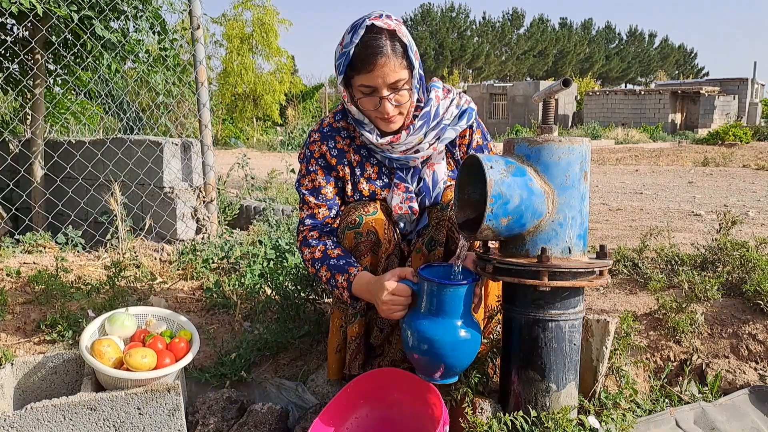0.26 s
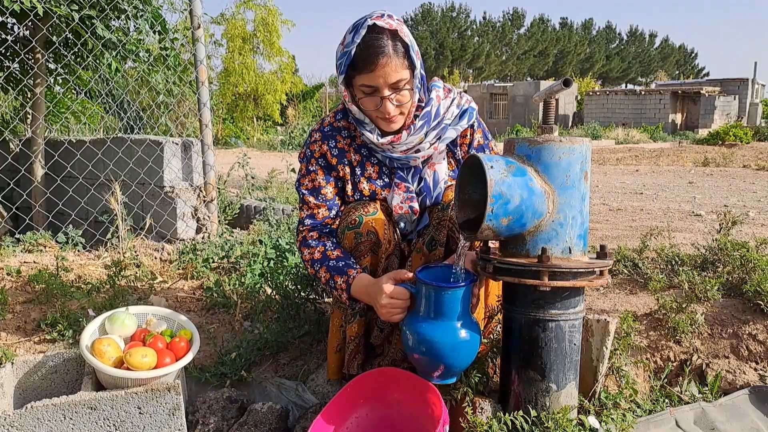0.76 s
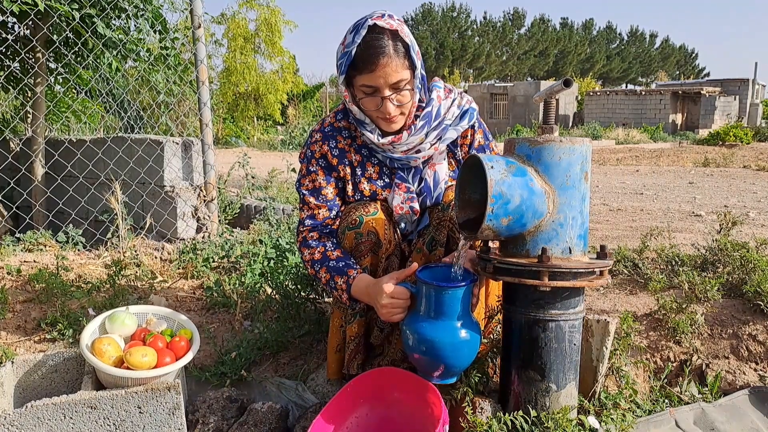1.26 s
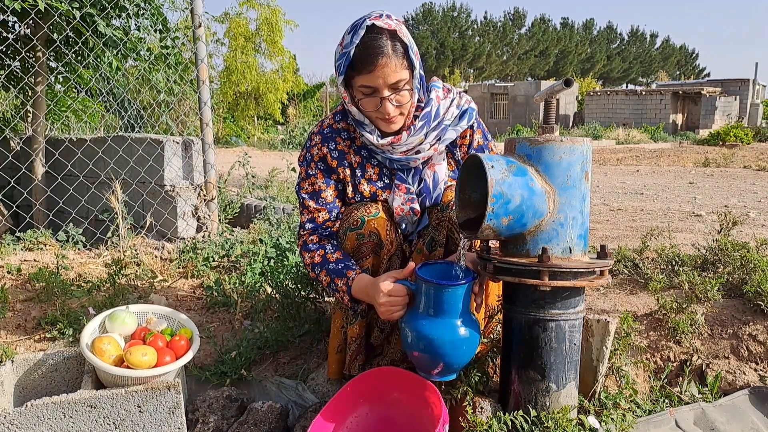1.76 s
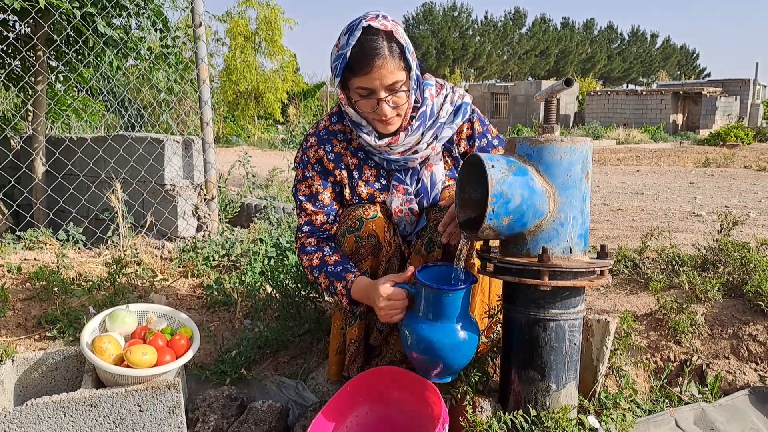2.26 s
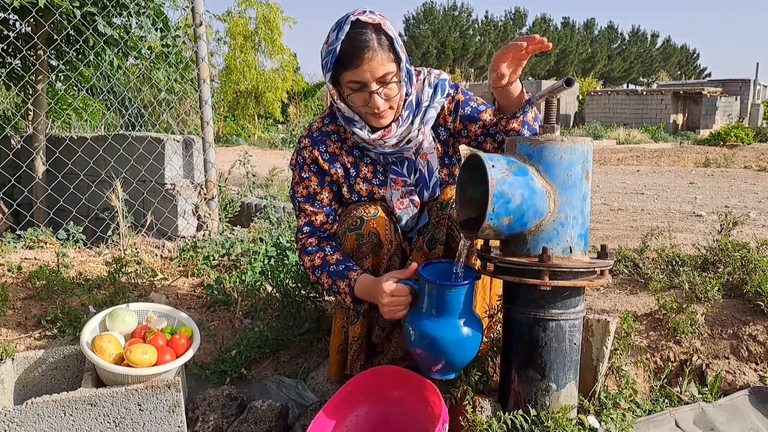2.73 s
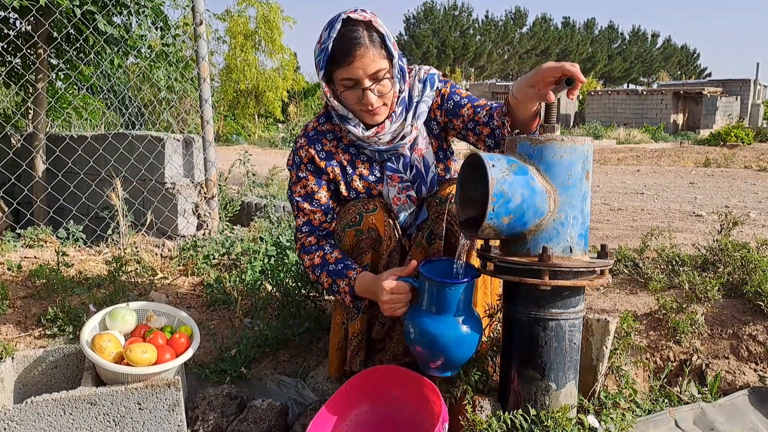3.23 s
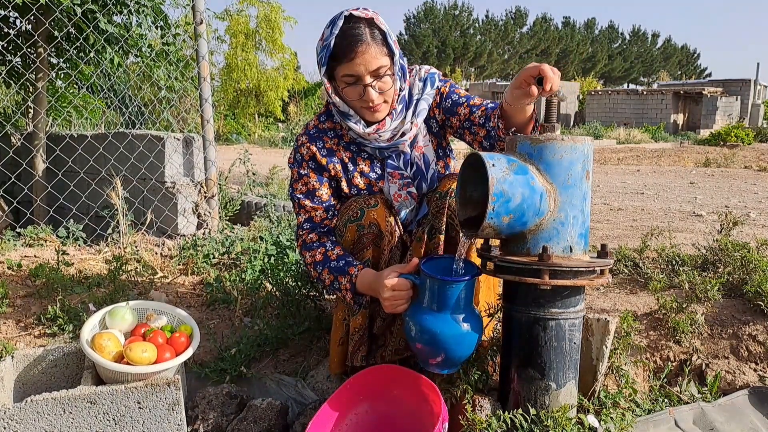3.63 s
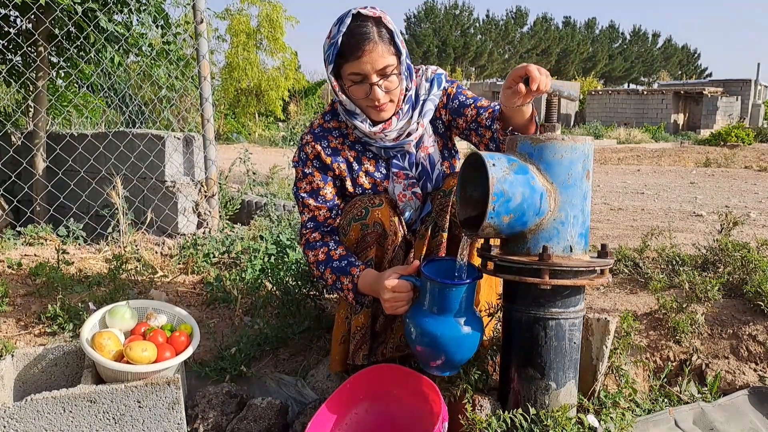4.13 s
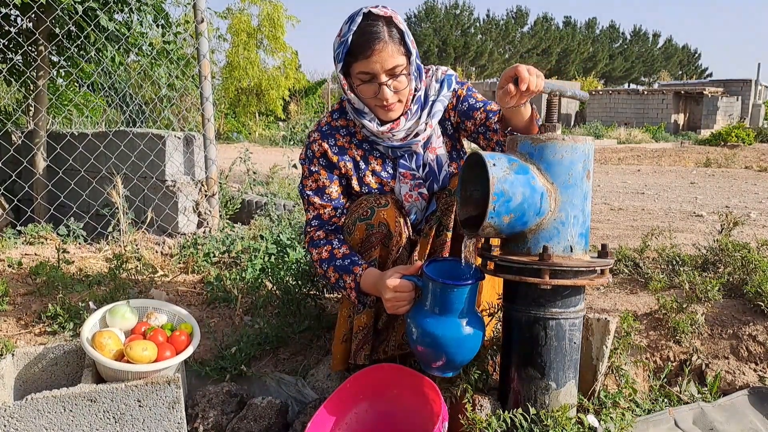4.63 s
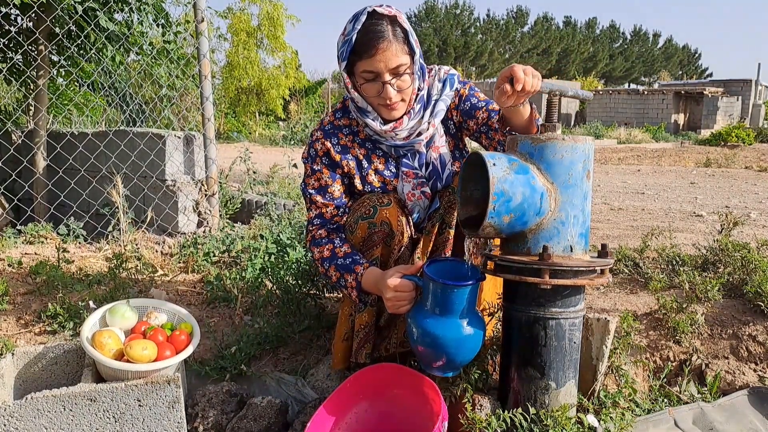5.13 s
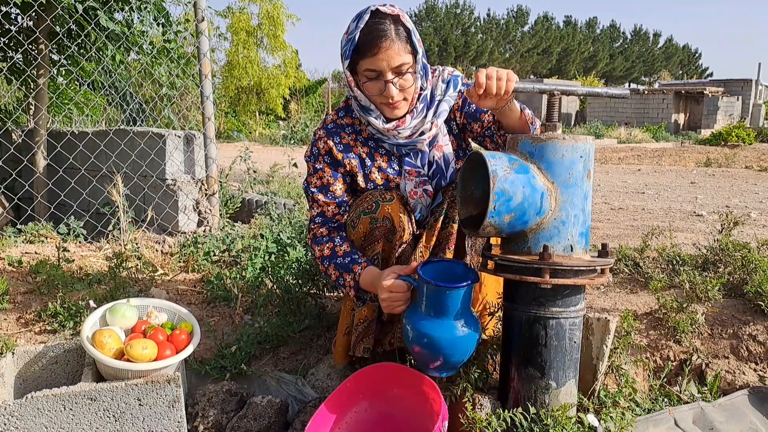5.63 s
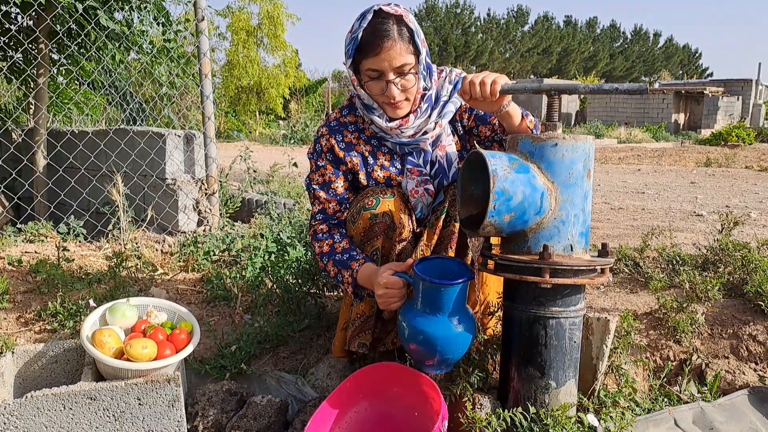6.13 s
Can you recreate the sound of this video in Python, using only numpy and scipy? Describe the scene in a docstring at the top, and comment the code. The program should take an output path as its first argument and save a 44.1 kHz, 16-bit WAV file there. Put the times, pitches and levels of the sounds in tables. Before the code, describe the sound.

A thin stream of water falls from a hand pump into a plastic jug close by, with crackling drops, glugs and plinks, its hollow note slowly rising. The jug knocks dully near the start, then the iron pump gives one sharp clack. Its loose handle later ticks twice. The flow dwindles and spatters as the jug is drawn away. Behind it, a distant engine hums in the open air.

```python
"""A thin stream of water falls from an outdoor hand pump into a plastic jug.
Drops crackle, trapped bubbles glug and plink, and the air in the jug rings higher as it fills.
The jug knocks dully, the iron pump clacks once, and its loose handle ticks twice.
The flow dwindles, then spatters as the jug is drawn away. An engine drones far off in the open air."""
import sys
import numpy as np
from scipy import signal
from scipy.fft import rfft, irfft, next_fast_len
from scipy.io import wavfile

SR = 44100
rng = np.random.default_rng(int(sys.argv[2]) if len(sys.argv) > 2 else 0)


def transcribe(signal):
    """Save signal, clipped to [-1, 1], as a 16-bit WAV file at the path in sys.argv[1]."""
    frames = np.atleast_2d(signal).T
    limited = np.clip(frames, -1, 1)
    pcm = np.round(limited * 32767).astype(np.int16)
    wavfile.write(sys.argv[1], SR, pcm)


N = 281799
TIME = np.arange(N) / SR
SHORT = np.arange(3000) / SR  # seconds, for one bubble or drop

# The stream swells, slackens and dwindles. Each row: time in seconds, bubbling in dB, spray in dB.
STREAM_FLOW = [(0, -60, -59.5), (.55, -56.5, -60), (1.1, -58, -59.5), (1.47, -53, -55), (1.95, -60, -60),
               (2.48, -53, -56), (2.85, -57, -62), (3.15, -52, -62), (3.95, -58, -59.5),
               (4.35, -58.5, -60.5), (4.7, -58.5, -60.5), (4.95, -54.5, -60), (5.15, -55.5, -60),
               (5.45, -58.5, -64.5), (5.62, -61.5, -79), (5.85, -60.5, -71), (6.15, -64, -72.5),
               (6.39, -83, -70)]
# The note of the air in the jug's neck. Each row: time in seconds, pitch in Hz, strength in dB.
NECK_TONE = [(0, 538, -1), (.5, 585, 1), (.8, 630, 4), (1.3, 611, 4.5), (2, 648, 5), (2.3, 647, -2),
             (2.7, 687.7, 2), (3.2, 682, -6.5), (3.55, 688.7, -5), (6.39, 656, -14)]
# Higher notes of the air in the jug, which come and go as the water rises. Each row: start and end
# in seconds, first and last pitch in Hz, width in Hz, strength in dB.
AIR_NOTES = [(-.5, 1.1, 1790, 1730, 90, 5.5), (1.1, 3.6, 1660, 1630, 120, 0),
             (-.5, 2.7, 3130, 3180, 120, 6), (.1, 1.3, 3850, 3700, 260, -1.5),
             (2.7, 4.8, 2080, 2160, 85, 8), (3.3, 5.2, 3430, 3480, 170, 6), (3.9, 5.5, 1050, 1000, 260, -2)]
# The loudest glugs, near the neck tone. Each row: start in seconds, level in dB.
LOUD_GLUGS = [(.051, -31), (.619, -37), (.658, -35), (.782, -33), (.825, -33.5), (.851, -35),
              (1.051, -32.5), (1.157, -35), (1.24, -33), (1.252, -26), (1.291, -30.5), (1.474, -23.5),
              (1.521, -31.5), (1.616, -34), (1.668, -25.5), (1.731, -36.5), (1.788, -30), (1.872, -31),
              (1.924, -31.5), (1.951, -24), (1.986, -29.5), (2.019, -32.5), (2.053, -38), (2.089, -33.5),
              (2.109, -35), (2.144, -33.5), (2.252, -37), (2.463, -37), (2.522, -36), (2.555, -39),
              (2.642, -34), (2.745, -41), (2.799, -37.5), (2.945, -36), (3.104, -37), (3.173, -36.5),
              (3.187, -35.5), (4.855, -36.5)]
# The loudest small bubbles. Each row: start in seconds, level in dB, pitch in Hz.
LOUD_PLINKS = [(0.048, -36.5, 1094), (.049, -35, 1745), (0.251, -34, 3680), (0.252, -37.5, 1620),
               (.617, -36, 3180), (.619, -39, 1086), (.852, -31, 3770), (1.159, -38, 1120),
               (1.185, -38, 3600), (1.35, -37, 3250), (1.514, -37, 3180), (1.588, -31.5, 1680),
               (1.713, -34.5, 3230), (1.966, -35, 1012), (2.284, -35, 3160), (2.398, -36, 1680),
               (2.42, -40, 3300), (2.693, -38, 3440), (2.798, -38.5, 989), (2.823, -36, 1054),
               (3.433, -45, 870), (3.467, -33.5, 1980), (3.476, -32.5, 3497), (3.557, -40, 2100),
               (3.838, -37.5, 1980), (3.868, -38.5, 3634), (3.886, -34, 2153), (3.942, -33.5, 1117),
               (3.983, -38, 2090), (3.991, -39, 960), (4.107, -37.5, 1030), (4.135, -38, 3468),
               (4.248, -37, 1100), (4.293, -39.5, 983), (4.308, -37, 1050), (4.335, -39, 3650),
               (4.471, -37, 1180), (4.51, -40, 3490), (4.544, -38, 3600), (4.564, -41, 1111),
               (4.587, -35.5, 3450), (4.598, -33.5, 2144), (4.605, -26.5, 1015), (4.656, -38, 1030),
               (4.761, -36, 1074), (4.83, -40, 991), (4.85, -29.5, 928), (4.853, -35, 1190),
               (4.882, -30.5, 1100), (4.884, -41, 2250), (4.885, -45, 3520), (4.89, -38, 940),
               (4.958, -38.5, 3570), (4.964, -44, 1030), (4.987, -35, 1000), (5.019, -42, 1020),
               (5.036, -35.5, 1020), (5.097, -34, 1029), (5.256, -39, 1190), (5.304, -32, 975),
               (5.326, -37.5, 980)]
# The loudest drops. Each row: start in seconds, level in dB, pitch in Hz.
LOUD_DROPS = [(0.254, -28, 7560), (0.2903, -37, 7400), (0.574, -38.5, 8350), (0.8766, -32.5, 12400),
              (0.883, -43, 8200), (1.2873, -40.5, 7860), (1.522, -34.5, 12900), (1.528, -40, 8240),
              (1.5578, -36, 12700), (1.672, -36.5, 11100), (1.69, -35.5, 8050), (1.9513, -41.5, 7560),
              (2.0495, -38, 11500), (2.089, -38, 8260), (2.33, -38, 10200), (2.382, -35.5, 8440),
              (2.421, -39, 8400), (2.53, -30.5, 13070), (2.584, -35, 7400), (2.6973, -33, 11550),
              (2.702, -39, 8100), (2.968, -38.5, 7680), (3.22, -40, 7960), (3.23, -36, 8240),
              (3.256, -37.5, 12130), (3.466, -39.5, 7950), (3.555, -33, 12100), (3.692, -40, 10900),
              (3.829, -32, 8200), (3.986, -31.5, 10880), (4.0, -42, 8710), (4.022, -41, 7750),
              (4.039, -37.5, 11600), (4.0771, -39.5, 8530), (4.132, -33, 7590), (4.148, -33.5, 9560),
              (4.275, -41, 11300), (4.7527, -32.5, 11080), (4.79, -40, 7760), (4.8276, -30, 13200),
              (4.851, -34, 11000), (4.876, -33.5, 8050), (4.881, -30.5, 12370), (4.9061, -43, 10900),
              (4.931, -39, 7790), (4.964, -41, 8690), (4.9752, -30.5, 11700), (5.0203, -35.5, 14400),
              (5.036, -41, 12100), (5.0954, -35, 8400), (5.326, -47, 11270), (5.722, -40, 7680),
              (6.1189, -44, 6900), (6.2424, -38.5, 10400), (6.301, -43, 14180)]
# The churn under the stream. Each row: time in seconds, churn in dB, spout hiss in dB.
CHURN_LEVELS = [(0, -62, -68), (1.1, -62, -68), (2, -60.5, -73), (2.35, -53, -62), (2.8, -62.5, -64),
                (3.2, -57, -63), (4, -57, -69), (4.2, -63, -75), (4.9, -56.5, -65), (5.35, -57, -63),
                (5.8, -53.5, -62.5), (6, -57, -60), (6.18, -63, -73), (6.39, -57, -65)]

# The colours of the water sounds: how strong their low and high parts are.
# Each row: frequency in Hz, level in dB.
BUBBLE_COLOUR = [(200, -24), (450, -3), (800, -4.5), (1080, 5.5), (1400, -2), (1700, 2), (2000, -1.5),
                 (2250, -7.5), (2480, -12), (2750, -5.5), (3050, -1.5), (3500, -6), (4100, -7),
                 (4700, -16.5), (8000, -51)]
SPRAY_COLOUR = [(2400, -22.5), (3700, 2), (4500, -7), (5100, -3), (5600, -8), (6100, 0.5), (6900, -6.5),
                (7900, 1), (9400, -8.5), (11400, -1), (12600, -4), (13800, -7), (15200, -4), (16000, -16.5)]
RIM_SPILL_COLOUR = [(1000, -19), (3000, 2), (4500, -5), (6000, -1), (7500, -7), (11000, 1.5), (14300, 5),
                    (16000, -3)]
DROP_SPLASH_COLOUR = [(800, -12), (1700, -6), (2500, -6), (3600, 0.5), (4500, -2), (5300, -1), (6900, -2),
                      (7900, -1), (9400, -5.5), (11400, 1.5), (13800, -5), (16000, -13)]
CHURN_BODY_COLOUR = [(300, -20), (700, -6), (1100, 0), (1600, -1), (2100, -4), (2500, -19.5), (5000, -42)]
SPOUT_HISS_COLOUR = [(1800, -24), (2500, -9.5), (3050, 0.5), (3600, -7.5), (4100, -4.5), (4700, -21),
                     (6000, -11), (7700, -12), (12000, -26)]

# Hits on the jug, the pump and its handle. Each row: start in seconds, level in dB.
JUG_KNOCKS = [(0.396, -45), (0.404, -46.5), (0.416, -47), (.434, -40), (0.459, -39.5)]
PUMP_HITS = [(1.4088, 0.5), (1.411, 1), (1.42, -9.5)]
HANDLE_TICKS = [(3.0116, -38.5), (6.289, -42)]
# The notes each one rings with. Each row: pitch in Hz, level in dB, seconds to fade by 60 dB.
JUG_WALL_NOTES = [(252.4, 2, 0.17), (340, 6, 0.044), (459, 8, 0.085), (636, -8.5, 0.21)]
IRON_NOTES = [(172, 11, .07), (245, 6, .06), (395, 1, .07), (968, -10, .1), (1415, -5, .07), (1665, 1, .13),
              (1820, -1, .08), (2088, 1, .15), (2258, 3, .13), (3222, -2, .14), (3431, -2, .2),
              (5430, -13, .1), (5550, -11, .1), (6490, -8, .1), (7470, -15, .1), (8860, -10, .12),
              (10950, -12, .08), (12500, -10, .07), (13260, -8, .07)]
HANDLE_NOTES = [(1020, -24, 0.025), (1605, -8.5, 0.043), (2880, -4.5, 0.023), (3010, 0, 0.026),
                (3430, -15, 0.056), (5950, -13, 0.019)]
# The colours of a crack on iron and of its echo from the yard. Each row: frequency in Hz, level in dB.
CRACK_COLOUR = [(150, 10), (420, 3.5), (700, -9), (1000, 8.5), (1300, 2), (2200, 11), (2800, -3.5),
                (3400, 10.5), (4300, -10), (5500, 3.5), (7000, 0), (9500, -3.5), (13300, 1.5), (14200, -18),
                (16000, -11)]
ECHO_COLOUR = [(2500, 1.5), (6000, -1.5), (12000, -3)]

# The far engine. Each row: time in seconds, firing rate in Hz, level in dB.
ENGINE_TONE = [(0, 81.45, -42.5), (.4, 80.9, -42), (.85, 81.16, -40), (1.25, 81.9, -32.5),
               (1.65, 82.2, -32), (2.45, 83.2, -34), (2.75, 81.83, -41), (3.15, 84, -34), (3.5, 83.27, -34),
               (3.85, 83.95, -31), (4.35, 83.9, -39.5), (4.75, 84.56, -37), (5.5, 83.47, -33),
               (5.8, 84.74, -31), (6.15, 83.8, -33.5), (6.39, 83.3, -40.5)]
# The colour of the open air. Each row: frequency in Hz, level in dB.
OPEN_AIR_COLOUR = [(15, -30), (30, -18), (42, -3), (70, 1), (95, -3), (125, -11), (180, -16), (330, -21),
                   (650, -21), (1000, -26), (1650, -27), (2100, -33), (2550, -42), (3050, -39), (3600, -48),
                   (4900, -53), (16000, -54)]
# How alike that air sounds left and right. Each row: frequency in Hz, likeness from 0 to 1.
OPEN_AIR_LIKENESS = [(30, 0.98), (120, 0.98), (250, 0.92), (600, 0.52), (1500, 0.0099), (4000, 0.77)]
# How the right side differs from the left. Each row: frequency in Hz, change in dB.
RIGHT_SHADE = [(100, -2), (600, -3.5), (950, -2.5), (1300, -1.5), (1700, -5.5), (2100, -13), (2800, -3),
               (3500, -4), (5000, 0.5), (6000, -5), (7000, -4), (7800, 1.5), (10500, -1.5), (13000, -0.5)]


def bubbling(level_db, sizes=28):
    """Swarms of small bubbles form under the stream and make the air in the jug ring."""
    swarm = np.zeros((2, N))
    for hz in np.geomspace(400, 5000, sizes):
        ring = bubble(hz, fade_cycles=3.0, swell_cycles=0.51, glide=0.06)
        pop = convolve(ring, bounces(direct=1500 / hz, near_s=0.000097, tail_db=-9.0, tail_s=0.011))
        swarm += np.sqrt(hz) * evened(convolve(impacts(per_s=65, spread_db=4.2), pop))
    swarm = colour(swarm, BUBBLE_COLOUR)
    swarm *= amp(2.7 * wander(16, 80))  # lumps in the stream stir all sizes at once
    neck_hz, neck_db = curves(NECK_TONE)
    sloshing_hz = neck_hz * (1 + .016 * wander(3.2, 22))  # the moving surface shakes the pitch
    sharp_ring = amp(19.5 + neck_db) * resonate(swarm, sloshing_hz, width_hz=22.3)
    broad_ring = amp(10.5) * resonate(swarm, neck_hz, width_hz=120)
    return evened(jug_hollow(swarm) + sharp_ring + broad_ring) * amp(level_db + 3.5)


def glugs_and_plinks(bubbling_db):
    """The stream drags pockets of air under; each splashes, rings and stirs the air in the jug's neck."""
    out = np.zeros((2, N))
    neck_hz, neck_db = curves(NECK_TONE)
    typical_hz, detune = 650, .018
    glugs = [(s, db, np.interp(s, TIME, neck_hz) * (1 + detune * rng.standard_normal()))
             for s, db in LOUD_GLUGS]
    for s, db, hz in glugs + LOUD_PLINKS + weak_glugs(neck_hz, neck_db) + weak_plinks(bubbling_db):
        length = 1 + .45 * rng.uniform(-1, 1)
        cycles = length * 4.2 * (hz / typical_hz) ** .45  # higher bubbles ring for more cycles
        ring = bubble(hz, fade_cycles=cycles, swell_cycles=1.54, glide=.07 * rng.random())
        heard = convolve(ring, bounces(direct=1300 / hz, near_s=0.0042, tail_db=-17, tail_s=0.039))
        heard = heard / abs(heard).max(1, keepdims=True)
        octaves_up = min(np.log2(hz / typical_hz), 1)
        splash = amp(-15 + 2 * octaves_up) * burst(BUBBLE_COLOUR, decay_s=0.008)
        add(out, s - .001, amp(db - 3.5) * (heard + splash))
    return out + amp(-11) * resonate(out, neck_hz, width_hz=59)


def weak_glugs(neck_hz, neck_db, per_s=20, spread_db=3):
    """Faint glugs come at random near the neck tone. Each row: start in seconds, dB, Hz."""
    at = np.flatnonzero(rng.random(N) < per_s / SR)
    size, detune = rng.standard_normal((len(at), 2)).T
    db = -44.5 + neck_db[at] + spread_db * size
    return list(zip(at / SR, db, neck_hz[at] * (1 + .09 * detune)))


def weak_plinks(bubbling_db, per_s=20, spread_db=3):
    """Small bubbles ring at random near the jug's higher notes. Each row: start in seconds, dB, Hz."""
    rows = []
    for start, end, first_hz, last_hz, _, note_db in AIR_NOTES:
        at = np.flatnonzero((rng.random(N) < per_s / SR) & (TIME > start) & (TIME < end))
        size, detune = rng.uniform(-1.4, 1, (len(at), 2)).T
        hz = np.interp(at / SR, [start, end], [first_hz, last_hz])
        db = bubbling_db[at] + note_db + 5.5 + spread_db * size
        rows += zip(at / SR, db, hz * (1 + .05 * detune))
    return rows


def bubble(hz, fade_cycles, swell_cycles, glide):
    """One bubble swells, rings down, and rises in pitch as it nears the surface."""
    cycles = hz * SHORT
    loudness = (1 - np.exp(-(cycles / swell_cycles) ** 2)) * np.exp(-cycles / fade_cycles)
    rising_hz = hz * (1 + glide * np.tanh(cycles / fade_cycles / 2 - .5))
    return loudness / loudness.max() * np.sin(2 * np.pi * np.cumsum(rising_hz) / SR)


def jug_hollow(sound, fade_s=.3):
    """The air in the jug boosts a sound at its higher notes, each fading in and out in its turn."""
    out = sound
    for start, end, first_hz, last_hz, width_hz, db in AIR_NOTES:
        fade = np.clip(np.minimum(TIME - start, end - TIME) / fade_s, 0, 1)
        hz = np.interp(TIME, [start, end], [first_hz, last_hz])
        out = out + amp(db) * resonate(sound * fade, hz, width_hz)
    return out


def spray(level_db, spill_start_s=6.205, spill_rise_s=0.061):
    """The stream breaks up in spurts inside the jug, then spills past the rim as the jug leaves."""
    inside = droplets(per_s=45, shape=SPRAY_COLOUR)
    spurts_db = 1.2 * wander(1.4, 3.1)
    spill = droplets(per_s=22, shape=RIM_SPILL_COLOUR)
    spill_fade = np.clip((TIME - spill_start_s) / spill_rise_s, 0, 1) ** 2
    return inside * amp(level_db + 2.0 + spurts_db) + spill * amp(-51) * spill_fade


def droplets(per_s, shape, sizes=26):
    """Each droplet traps a tiny bubble that pings at its own pitch; together they make a soft fizz."""
    fizz = np.zeros((2, N))
    for hz in np.linspace(3000, 15500, sizes):
        ring = bubble(hz, fade_cycles=4.9, swell_cycles=0.44, glide=0.15)
        ping = convolve(ring, bounces(direct=0.14, near_s=0.0017, tail_db=-3.0, tail_s=0.017))
        fizz += evened(convolve(impacts(per_s, spread_db=4.6), ping))
    return evened(colour(fizz, shape) * amp(1.7 * wander(14, 70)))


def drops(spray_db, per_s=26, range_db=11):
    """Single drops stand out of the spray: the loudest at set times, weaker ones at random."""
    out = np.zeros((2, N))
    for s, db, hz in LOUD_DROPS:
        add(out, s, drop(db, hz))
    pitches_hz = (6100, 7800, 8400, 11000, 12200)
    at = np.flatnonzero(rng.random(N) < per_s / SR)
    for i, (weakness, pick, detune) in zip(at, rng.random((len(at), 3))):
        hz = pitches_hz[int(pick * len(pitches_hz))] * (1 + .1 * (detune - .5))
        add(out, i / SR, drop(spray_db[i] + 19.5 - range_db * weakness, hz))
    return out


def drop(db, hz, snap_delay_s=0.0017):
    """A drop lands, snaps as its dent in the water closes, and throws up a short splash."""
    path = bounces(direct=.6, near_s=.0012, tail_db=-20, tail_s=.008)
    snap = convolve(bubble(hz, fade_cycles=5.0, swell_cycles=0.11, glide=0.0057), path)
    snap = np.pad(snap, ((0, 0), (round(snap_delay_s * SR), 0)))[:, :len(SHORT)]
    snap /= abs(snap.mean(0)).max()
    splash = burst(DROP_SPLASH_COLOUR, decay_s=0.004) * np.minimum(SHORT / snap_delay_s, 1) ** 2
    return amp(db) * (amp(-1.5) * snap + amp(-6) * splash)


def churn():
    """Countless bubbles too small to tell apart make a soft churn in the jug, and the stream hisses as it runs
    from the spout."""
    body_db, hiss_db = curves(CHURN_LEVELS)
    lumps = amp(2.8 * wander(14, 70))
    body = evened(jug_hollow(noise(CHURN_BODY_COLOUR, N))) * amp(body_db)
    hiss = evened(jug_hollow(noise(SPOUT_HISS_COLOUR, N))) * amp(hiss_db)
    return body * lumps + hiss * np.sqrt(lumps)


def jug_knocks():
    """The plastic jug, heavy with water, jolts in the hand and its walls ring dully."""
    out = np.zeros((2, N))
    for s, db in JUG_KNOCKS:
        add(out, s, amp(db) * struck(JUG_WALL_NOTES))
    return out


def pump_clack(crack_fade_s=0.027, echo_fade_s=0.26):
    """A hard blow on the iron pump: a crack, a thud and short ring, and a duller echo from the yard."""
    out = np.zeros((2, N))
    t = TIME[:SR // 2]
    for s, db in PUMP_HITS:  # so close together that they sound as one
        crack = evened(noise(CRACK_COLOUR, len(t)))
        echo = colour(crack, ECHO_COLOUR) * amp(-12.5 - 60 * t / echo_fade_s)
        add(out, s, amp(db - 23.5) * (crack * amp(-60 * t / crack_fade_s) + echo))
    hardest_s, _ = max(PUMP_HITS, key=lambda row: row[1])
    add(out, hardest_s, amp(-38.0) * struck(IRON_NOTES))
    return out * amp([[1.5], [-1.5]])  # louder on the left


def handle_ticks():
    """The loose handle clicks drily in its pivot as the hand takes it and swings it round."""
    out = np.zeros((2, N))
    for s, db in HANDLE_TICKS:
        add(out, s, amp(db) * struck(HANDLE_NOTES))
        add(out, s, amp(db - 4) * burst(CRACK_COLOUR, decay_s=0.0036))
    return out


def far_engine():
    """Only the firing tone of the engine carries this far; it swells slowly and wavers."""
    hz, db = curves(ENGINE_TONE)
    strength = amp(db) + amp(-49) * wander(2.8, 15.3)  # the wavering shows most when the tone is weak
    return strength * np.sqrt(2) * np.sin(2 * np.pi * np.cumsum(hz) / SR)


def open_air():
    """Distant rumble and the soft wash of open country."""
    size = next_fast_len(N)
    hz = np.fft.rfftfreq(size, 1 / SR)
    left, other = rfft(rng.standard_normal((2, size)))
    likeness = np.clip(value_at(OPEN_AIR_LIKENESS, hz), -1, 1)
    right = likeness * left + np.sqrt(1 - likeness ** 2) * other
    spectrum = np.array([left, right]) * amp(value_at(OPEN_AIR_COLOUR, hz))
    wash = evened(irfft(spectrum, size)[:, :N])
    return amp(-44.0) * wash * amp(1.8 * wander(1.0, 6.8))


def bounces(direct, near_s, tail_db, tail_s):
    """The path to both ears: direct sound, quick bounces off jug and pump, and a faint tail."""
    decay = np.exp(-SHORT / near_s) + amp(tail_db) * np.exp(-SHORT / tail_s)
    taps = rng.standard_normal((2, len(SHORT))) * decay / np.linalg.norm(decay)
    taps[0, 2] += direct  # reaches the left ear two samples later
    taps[1, 0] += direct
    return taps / np.sqrt(1 + direct ** 2)


def struck(notes):
    """A struck object rings with several notes, each fading at its own speed."""
    t = TIME[:SR // 2]
    return sum(amp(db - 60 * t / fade_s) * np.sin(2 * np.pi * hz * t) for hz, db, fade_s in notes)


def impacts(per_s, spread_db):
    """Taps at random times, most small and a few large."""
    at = rng.integers(0, N, rng.poisson(per_s * N / SR))
    signs = rng.choice([-1, 1], len(at))
    sizes = np.minimum(rng.exponential(1, len(at)), 4)
    train = np.zeros(N)
    train[at] = signs * amp(spread_db * sizes)
    return train


def burst(shape, decay_s):
    """A puff of noise that dies away quickly."""
    return evened(noise(shape, len(SHORT))) * np.exp(-SHORT / decay_s)


def noise(shape, samples):
    """Left and right noise with the given colour."""
    return colour(rng.standard_normal((2, samples)), shape)


def wander(lo_hz, hi_hz):
    """A random wobble of typical size 1, mostly between two rates."""
    size = next_fast_len(N)
    hz = np.fft.rfftfreq(size, 1 / SR)
    spectrum = rfft(rng.standard_normal(size)) * hz / (hz + lo_hz) / (1 + (hz / hi_hz) ** 2)
    return evened(irfft(spectrum, size)[:N])


def resonate(x, hz, width_hz):
    """Makes a sound ring at a moving pitch; a narrower width rings longer."""
    turn = np.exp(2j * np.pi * np.cumsum(hz) / SR)
    decay = np.exp(-np.pi * width_hz / SR)
    return 2 * (turn * signal.lfilter([1 - decay], [1, -decay], x / turn)).real


def colour(x, shape, size=2048):
    """Shapes the lows and highs of a sound while keeping sudden starts sharp."""
    hz = abs(np.fft.fftfreq(size, 1 / SR))
    log_gain = np.log(amp(value_at(shape, hz)))
    response = np.exp(np.conj(signal.hilbert(log_gain)))  # nothing rings ahead of a hit
    return convolve(x, np.fft.ifft(response).real[:size // 2])


def convolve(x, taps):
    """Filters a sound, keeping its length."""
    return signal.oaconvolve(np.atleast_2d(x), np.atleast_2d(taps), axes=1)[:, :x.shape[-1]]


def value_at(table, hz):
    """Reads between the rows of a frequency table, with octaves evenly spaced."""
    row_hz, value = np.transpose(table)
    return np.interp(np.log(hz + 1), np.log(row_hz + 1), value)


def curves(rows):
    """Turns a time table into one curve for each column after the time."""
    s, *columns = np.transpose(rows)
    return [np.interp(TIME, s, column) for column in columns]


def add(mix, s, sound):
    """Mixes a sound in, starting at s seconds."""
    part = mix[:, max(round(s * SR), 0):][:, :sound.shape[-1]]
    part += sound[..., :part.shape[1]]


def amp(db):
    """Turns decibels into a number to multiply by."""
    return 10 ** (np.asarray(db) / 20)


def evened(x):
    """Scales a sound to an average (rms) level of 1."""
    return x / np.sqrt(np.mean(x ** 2) + 1e-20)


def scene():
    """Water, jug and pump in front; engine and open air behind."""
    bubbling_db, spray_db = curves(STREAM_FLOW)
    water = bubbling(bubbling_db) + churn() + spray(spray_db)
    water += glugs_and_plinks(bubbling_db) + drops(spray_db)
    return water + jug_knocks() + pump_clack() + handle_ticks() + far_engine() + open_air()


def record(dry, top_hz=15900):
    """The right side is shaded, so it sounds duller; both sides lose the very highest treble."""
    pair = np.vstack([dry[0], colour(dry[1], RIGHT_SHADE)])
    treble_cut = signal.firwin(511, top_hz, window=("kaiser", 9), fs=SR)
    return signal.oaconvolve(pair, treble_cut[None], "same")


dry = scene()
out = record(dry)
transcribe(out)
```